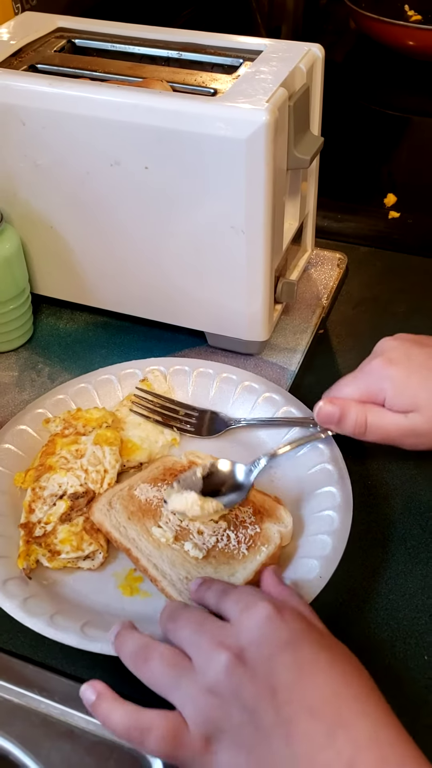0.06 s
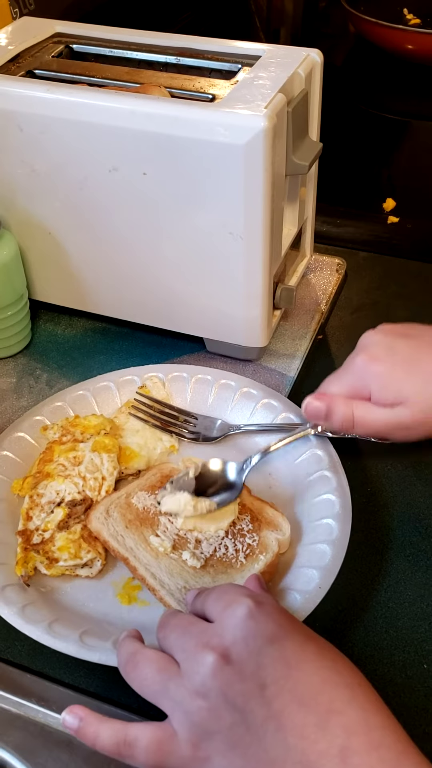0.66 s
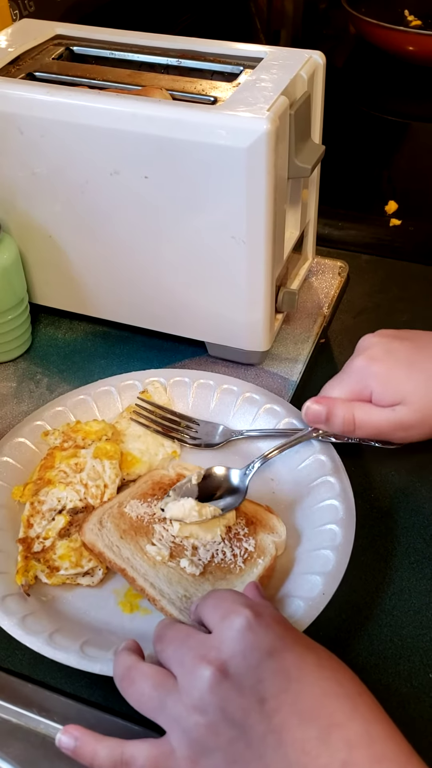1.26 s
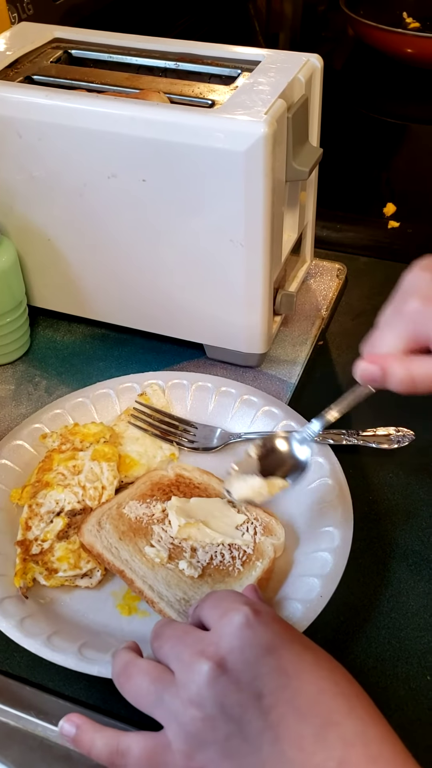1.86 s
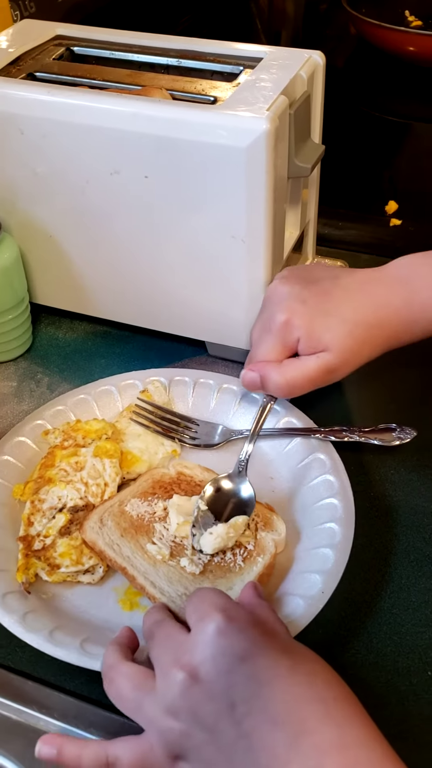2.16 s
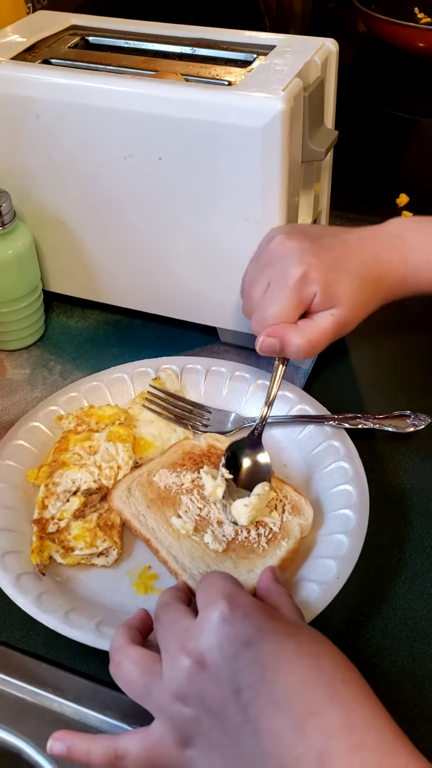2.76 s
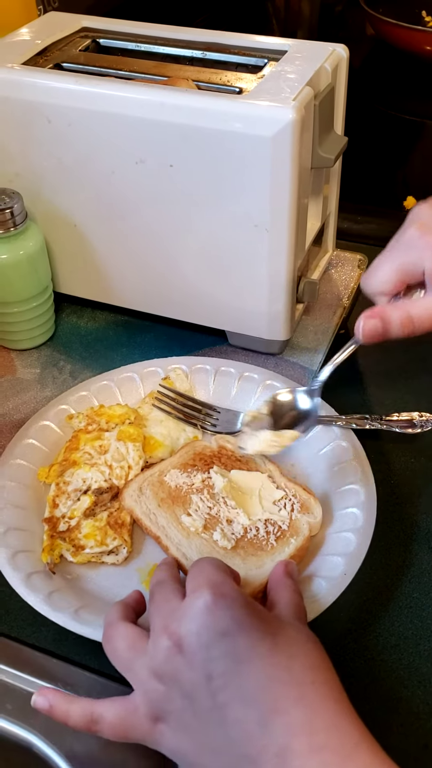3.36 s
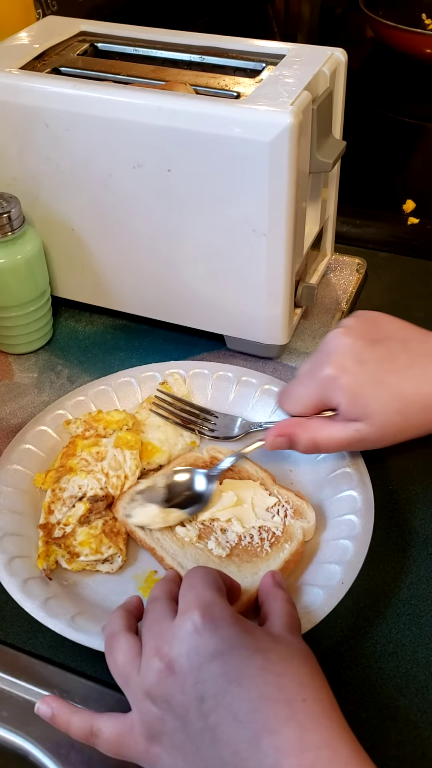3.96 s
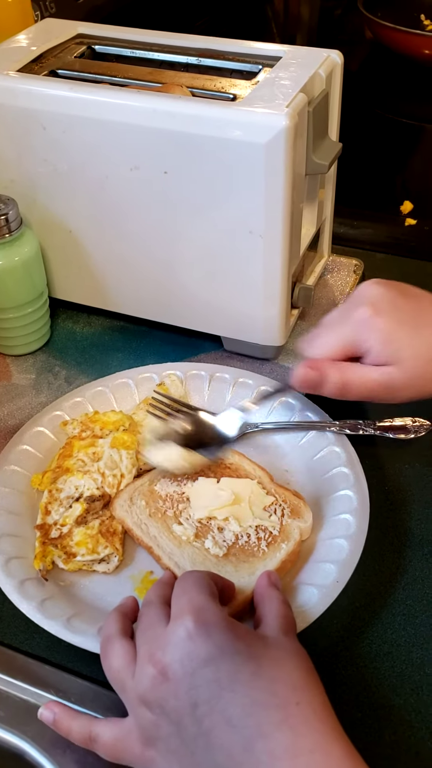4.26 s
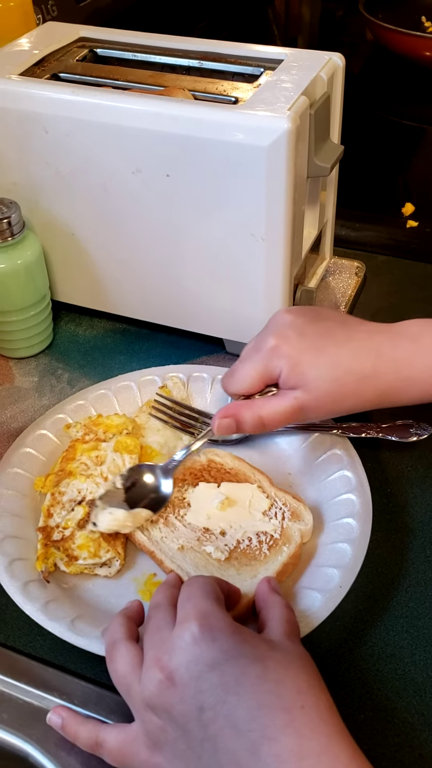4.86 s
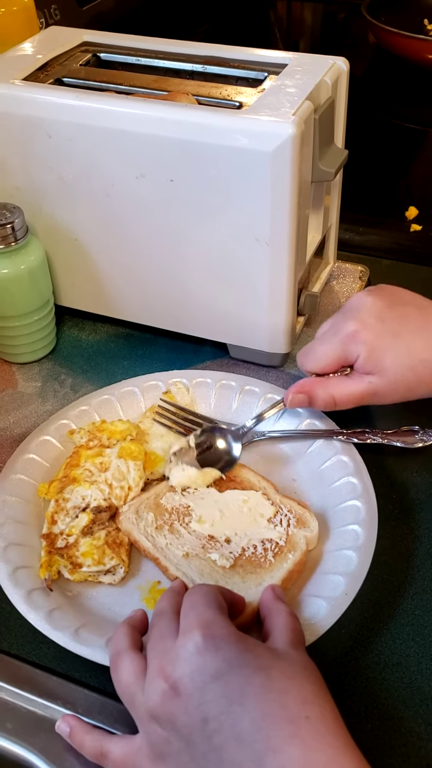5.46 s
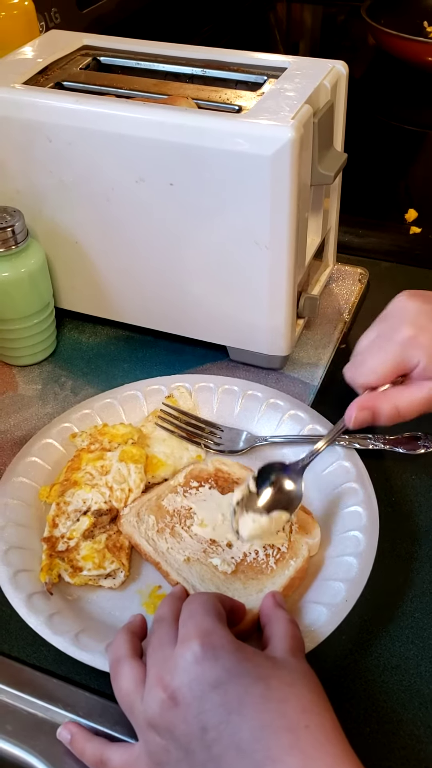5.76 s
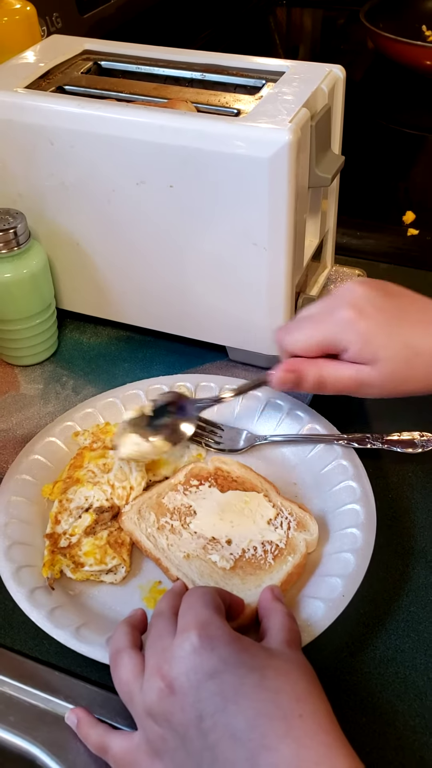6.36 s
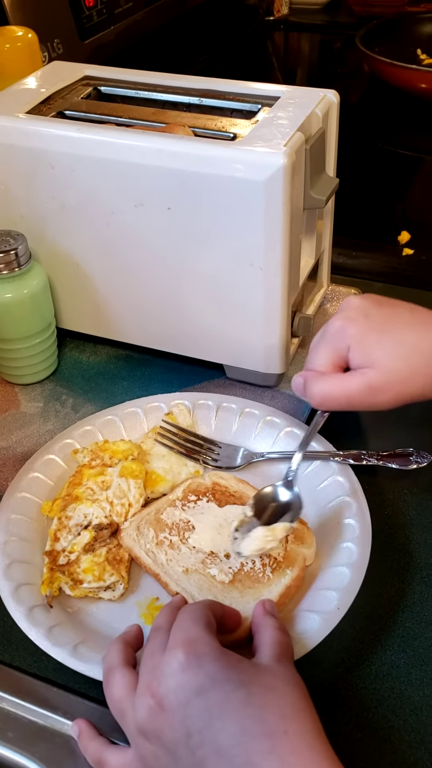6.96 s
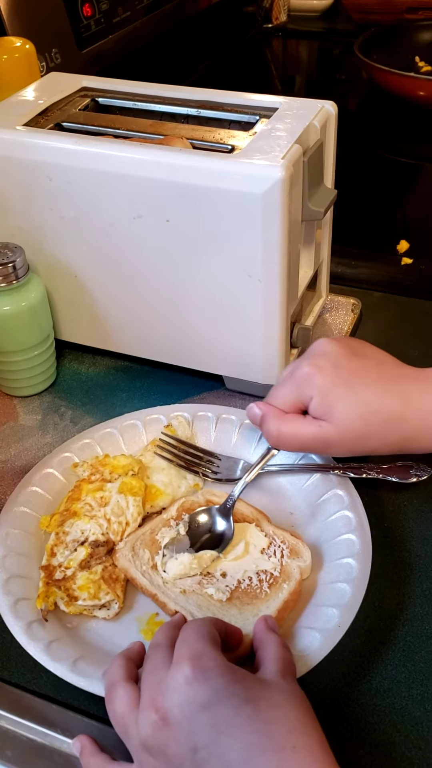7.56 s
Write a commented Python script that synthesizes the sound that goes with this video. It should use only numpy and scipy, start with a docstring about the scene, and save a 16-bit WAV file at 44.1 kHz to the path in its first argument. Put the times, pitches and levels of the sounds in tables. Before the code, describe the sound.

A metal spoon scrapes butter over dry toast in short scratchy strokes, with crisp crust cracks and a faint appliance hum.

```python
"""A metal spoon spreads butter on dry toast, close by in a small kitchen where an appliance hums.
From the start, friction crackles under each stroke and the spoon pats the light plate through the bread.
The brittle crust snaps in sharp single cracks, most often between 1 and 2.7 s.
Near 3 s two dull bumps excite the modes of the counter. The strokes go on, mostly softer,
until a last firm one breaks the crust again at about 7.4 s."""
import sys
import numpy as np
from scipy import signal
from scipy.fft import rfft, irfft, next_fast_len
from scipy.io import wavfile
from scipy.ndimage import map_coordinates

SR = 44100
rng = np.random.default_rng(int(sys.argv[2]) if len(sys.argv) > 2 else 0)


def store_wav(level_fs):
    """Save 16-bit WAV to argv[1]."""
    pcm = np.round(np.clip(np.atleast_2d(level_fs), -1, 1) * 32767)
    wavfile.write(sys.argv[1], SR, pcm.T.astype(np.int16))


N = 335160

# Levels are relative: each source applies its own gain and filters.
# partials of the appliance hum: pitch_hz, level_db
HUM_PARTIALS = [(53.4, -3.5), (106.4, -12), (267, -22)]
# spectrum of the room's air: frequency_hz, level_db
AIR_SPECTRUM = [(15, -44.5), (27, -27), (56, -0.5), (80, -9.5), (97, -19), (313, -19.5), (459, -21),
                (499, -29.5), (567, -25.5), (617, -33), (4000, -49), (5200, -86.5), (8800, -120)]
# left-right likeness of the air noise: frequency_hz, coherence_ratio
AIR_COHERENCE = [(100, 0.99), (300, 0.92), (700, 0.34), (2000, .1)]
# spectrum of the microphone hiss: frequency_hz, level_db
HISS_SPECTRUM = [(3500, -7.5), (5000, -5.5), (6000, -8), (6350, 7), (7000, -5), (7700, -2), (8200, -20.5),
                 (10000, -10.5), (12500, 2), (15800, -5.5)]
# stereo balance of the background: frequency_hz, left_minus_right_db
ROOM_BALANCE = [(60, 0), (110, -4), (200, -3.5), (380, -9.5), (700, -1), (1290, -2), (2380, 3.5),
                (4400, -2), (8120, -21.5), (15000, -6.5)]
# reverberation of the kitchen: frequency_hz, t60_s
KITCHEN_DECAY = [(200, 0.24), (2000, 0.36), (6000, 0.35), (15000, 0.33)]
# blows on the counter and the band each excites: start_s, level_db, low_hz, high_hz
COUNTER_BLOWS = [(2.835, -33.5, 109, 240), (2.859, -34.5, 59.5, 278), (2.913, -43, 45, 150),
                 (3.006, -36.5, 320, 745), (3.023, -31.5, 34.8, 80.5)]
# modes of the counter: pitch_hz, level_db, t60_s
COUNTER_MODES = [(68, 2.5, 0.22), (158, -14, 0.11), (167.3, 2.5, 0.16), (252.5, -17, 0.15),
                 (300, -18, 0.11), (361.5, -9, 0.16), (421, -13, 0.17), (494, -8.5, 0.18),
                 (1490, -18, 0.21)]
# the spoon presses the plate onto the counter: start_s, level_db
PLATE_PATS = [(0.001, -36), (0.041, -47), (0.411, -49), (0.69, -46.5), (0.716, -45.5), (1.11, -35),
              (1.168, -42), (1.438, -46.5), (1.465, -36.5), (2.567, -51), (3.006, -45), (4.034, -46),
              (4.425, -48.5), (5.574, -48.5), (7.16, -52), (7.184, -50)]
# modes of the plate: pitch_hz, level_db, t60_s
PLATE_MODES = [(288, -6.5, 0.064), (372, -2, 0.021), (454, 0.5, 0.055), (650, -11.5, 0.017),
               (930, -9.5, 0.033), (1070, -7, 0.093), (1820, -15, .04)]
# spectrum of the rustle in a pat: frequency_hz, level_db
RUSTLE_SPECTRUM = [(40, -15), (130, -1.5), (450, -5.5), (750, -8.5), (1100, -10.5), (2500, -18),
                   (6000, -19)]
# strokes of the spoon: start_s, length_s, firmest_fraction, level_db, body_offset_db, crumb_offset_db
SPOON_STROKES = [(0.0, 0.093, 0.16, -35.5, 2.5, -7.5), (0.093, 0.24, 0.4, -48.5, -2.5, 1.5),
                 (0.408, 0.089, 0.4, -64, 3.5, 0), (0.694, 0.28, .1, -61.5, -2, 12),
                 (0.848, 0.15, 0.7, -58.5, 7, 19), (1.099, 0.093, 0.16, -50, 8, 4),
                 (1.358, 0.13, 0, -45.5, -13.5, -13), (1.607, 0.12, 1, -59.5, 5, -7),
                 (2.007, 0.38, 0.25, -54.5, -8.5, -7.5), (2.309, .11, 1, -65.5, 14.5, 17),
                 (2.481, .15, 0.3, -47, 9, 3), (2.658, 0.13, 0.28, -56, 2.5, -20),
                 (2.788, 0.17, 0.25, -57, 1.5, -2), (3.053, 0.44, 0.31, -55, -2.5, -7),
                 (3.762, 0.23, 0.3, -57, 3, -1.5), (3.934, 0.11, 0.57, -51.5, 2.5, 29),
                 (4.475, .14, 0.4, -52, 2, -5), (4.69, 0.36, .5, -59, -7, 12),
                 (5.26, 0.14, 0.9, -69, -7, 11), (5.436, 0.22, 0.3, -53.5, -2.5, 2.5),
                 (5.686, 0.27, 0.6, -60.5, -17, -3), (5.987, 0.08, 0.7, -50, -2, 4),
                 (6.076, 0.21, 0.07, -50, -1, 7), (6.371, 0.22, 0.38, -73, -6, -5),
                 (6.597, 0.087, 0, -59.5, -3, -4), (6.76, 0.22, 0.13, -70.5, -11, 1),
                 (7.05, 0.39, 0.3, -69, -4, 15), (7.263, .26, 0.77, -45.5, -6.5, -1.5)]
# spectrum of the spoon on buttered toast: frequency_hz, level_db
SCRAPE_SPECTRUM = [(410, -45), (700, -17.5), (958, -13), (1060, -10), (1150, -10.5), (1250, -13),
                   (1620, -4.5), (1970, -10), (2270, -6), (3280, -16), (6650, 3), (8210, -14.5),
                   (12300, -4), (15200, -4), (16000, -21.5)]
# the loudest breaks of the crust: start_s, level_db, body_level_db
CRUST_BREAKS = [(0.154, -21, -49), (0.3057, -27, -58.5), (0.6883, -36, -49.5), (0.9133, -28, -59.5),
                (0.9857, -29, -55), (1.1104, -20.5, -52.5), (1.1144, -13, -41.5), (1.2466, -35.5, -70),
                (1.4097, -21, -58), (1.4456, -21, -42), (1.5135, -23, -45.5), (1.6352, -23.5, -60),
                (1.6621, -18, -47.5), (1.8018, -26, -50.5), (2.1156, -29, -48.5), (2.1645, -29, -56.5),
                (2.3136, -26, -57.5), (2.3595, -20.5, -41), (2.4698, -19.5, -43), (2.4904, -20, -47.5),
                (2.5007, -17.5, -44), (2.5481, -17.5, -48), (2.5564, -24.5, -41.5), (2.6479, -25.5, -56),
                (2.8613, -36.5, -65), (3.7818, -25.5, -67), (3.9564, -28, -59.5), (3.977, -32.5, -62),
                (4.0367, -40, -41), (4.0497, -23.5, -56), (4.5042, -28, -49), (4.5416, -30, -55),
                (4.8479, -41, -75), (4.8973, -37.5, -59), (4.9119, -36.5, -71), (5.484, -35.5, -76),
                (5.5797, -39, -57.5), (6.0008, -23, -53), (6.1988, -36.5, -71), (7.3816, -17.5, -46),
                (7.4594, -23, -48.5)]
# spectrum of the breaking crust: frequency_hz, level_db
CRUST_SPECTRUM = [(290, -46.5), (500, -16), (807, -29), (1130, -14.5), (1360, -21), (1640, -9.5),
                  (2070, -14), (2570, -8.5), (3340, -16), (4660, -6), (6900, 3.5), (8210, -11.5),
                  (10500, -7), (12100, -0.5), (16000, -6.5)]
# stereo balance of toast and plate: frequency_hz, left_minus_right_db
TOAST_BALANCE = [(200, -7.5), (700, -5.5), (1800, -12.5), (3500, -8), (5000, -17.5), (6700, -23.5),
                 (7600, -16.5), (8400, 9.5), (9500, -2.5), (11000, -3.5), (12300, -14), (15500, -6.5)]


def amp(db):
    """Amplitude ratio: tenfold for every 20 dB."""
    return 10 ** (np.asarray(db) / 20)


def unit_rms(x):
    """Normalisation to unit mean power."""
    return x / np.sqrt(np.mean(x ** 2) + 1e-20)


def along(points, hz):
    """Interpolation of (frequency_hz, value) points on a logarithmic frequency axis."""
    frequencies, values = np.transpose(points)
    return np.interp(np.log(hz + 1), np.log(frequencies + 1), values)


def wobble(rate_hz):
    """Random modulation: a spline through rate_hz Gaussian knots a second."""
    knots = rng.standard_normal(int(N * rate_hz / SR) + 4)
    return map_coordinates(knots, [np.arange(N) * rate_hz / SR])


def filtered(x, gain):
    """Minimum-phase filtering: folding the cepstrum makes the magnitude response gain(hz) causal."""
    size = 2 * next_fast_len(N // 2 + SR // 4)
    magnitude = np.maximum(gain(np.fft.rfftfreq(size, 1 / SR)), 1e-6)
    cepstrum = irfft(np.log(magnitude), size)
    cepstrum[..., 1:size // 2] *= 2
    cepstrum[..., size // 2 + 1:] = 0
    return irfft(rfft(x, size) * np.exp(rfft(cepstrum)), size)[..., :N]


def coloured(x, spectrum):
    """Spectral shaping that conserves the power of white noise."""
    return filtered(x, lambda hz: unit_rms(amp(along(spectrum, hz))))


def panned(x, balance):
    """Constant-power panning: the level difference between the channels depends on frequency."""
    def gains(hz):
        pair = amp(np.outer([.5, -.5], along(balance, hz)))
        return pair / np.sqrt(np.mean(pair ** 2, axis=0))
    return filtered(x, gains)


def bandpass(x, low_hz, high_hz, order):
    """Butterworth filtering: a maximally flat pass band."""
    return signal.sosfilt(signal.butter(order, [low_hz, high_hz], "band", fs=SR, output="sos"), x)


def crossover(surface, body, split_hz):
    """Complementary bands: treble from the surface, middle tones from the bread beneath."""
    treble = filtered(surface, lambda hz: 1 / np.sqrt(1 + (split_hz / (hz + 1)) ** 8))
    return treble + filtered(body, lambda hz: 1 / np.sqrt(1 + (hz / split_hz) ** 8))


def add(track, start_s, sound):
    """Superposition: a sound joins the track at start_s."""
    start = max(round(start_s * SR), 0)
    part = sound[..., :N - start]
    track[..., start:start + part.shape[-1]] += part


def ring(modes, t):
    """Free vibration: a sum of damped modes, varied in strength and pitch at each blow."""
    hz, db, t60 = np.transpose(modes)[:, :, None]
    strength, detune = rng.standard_normal((2, len(modes), 1))
    envelopes = amp(db + 3.7 * strength - 60 * t / t60)
    return np.sum(envelopes * np.sin(2 * np.pi * hz * (1 + 0.023 * detune) * t), axis=0)


def appliance_hum(hum_db=-63, waver_db=3.5, waver_hz=9, drift_s=0.00075):
    """Amplitude and phase modulation make the appliance's low partials waver."""
    t = np.arange(N) / SR + drift_s * wobble(3)
    return np.sqrt(2) * sum(amp(hum_db + db + waver_db * wobble(waver_hz)) * np.sin(2 * np.pi * hz * t)
                            for hz, db in HUM_PARTIALS)


def room_air(air_db=-65):
    """Partial coherence: the air's murmur is alike in both channels only at low frequencies."""
    def mid_side_gains(hz):
        angle = np.arccos(along(AIR_COHERENCE, hz)) / 2
        return np.array([np.cos(angle), np.sin(angle)])
    murmur = coloured(rng.standard_normal((2, N)), AIR_SPECTRUM)
    mid, side = filtered(murmur, mid_side_gains)
    return amp(air_db) * np.array([mid + side, mid - side])


def microphone_hiss(hiss_db=-75):
    """Self-noise: a faint hiss, uncorrelated between the channels."""
    return amp(hiss_db) * coloured(rng.standard_normal((2, N)), HISS_SPECTRUM)


def kitchen_reverb(x, near_db, room_db, near_t60_s):
    """Convolution adds early reflections off toaster and counter, and the room's diffuse tail."""
    out, block = np.zeros((2, N)), SR // 4
    for start in range(0, N, block):  # the echoes change as the spoon moves
        hz, frame_s, noise = signal.stft(rng.standard_normal((2, SR // 2)), SR, nperseg=256)
        decay = amp(-60 * frame_s / along(KITCHEN_DECAY, hz)[:, None])
        tail = signal.istft(noise * decay, SR, nperseg=256)[1]
        t = np.arange(tail.shape[1]) / SR
        near = rng.standard_normal(tail.shape) * amp(-60 * t / near_t60_s)
        response = amp(near_db) * near / np.linalg.norm(near[0])
        response += amp(room_db) * tail / np.linalg.norm(tail[0])
        response[:, 0] += 1  # direct sound
        add(out, start / SR, signal.fftconvolve(x[:, start:start + block], response, axes=1))
    return out


def counter_bumps(gain_db=-3, thud_db=-5, thud_t60_s=.4):
    """Modal excitation: soft blows set the counter booming; harder contact reaches higher modes."""
    out, t = np.zeros(N), np.arange(SR // 2) / SR
    for start_s, db, low_hz, high_hz in COUNTER_BLOWS:
        rumble = unit_rms(bandpass(rng.standard_normal(len(t)), low_hz=49, high_hz=557, order=4))
        thud = amp(thud_db - 60 * t / thud_t60_s) * rumble
        boom = bandpass(ring(COUNTER_MODES, t) + thud, low_hz, high_hz, order=1)
        add(out, start_s, amp(db + gain_db) * boom)
    return out * amp([[-1.5], [1.5]])  # slightly to the right


def plate_pats(gain_db=-9, rustle_db=-1, tick_db=5, rustle_t60_s=0.096, tick_t60_s=.009):
    """Impact: pressing the bread gives a tick, a rustle and the hollow knock of damped plate modes."""
    t = np.arange(SR // 5) / SR
    knocks, rustles, ticks = np.zeros((3, 2, N))
    for start_s, db in PLATE_PATS:
        add(knocks, start_s, amp(db) * ring(PLATE_MODES, t))
        add(rustles, start_s, amp(db - 60 * t / rustle_t60_s) * rng.standard_normal(len(t)))
        add(ticks, start_s, amp(db + tick_db - 60 * t / tick_t60_s) * rng.standard_normal((2, len(t))))
    rustles = amp(rustle_db) * coloured(rustles, RUSTLE_SPECTRUM)
    return amp(gain_db) * (knocks + coloured(ticks, SCRAPE_SPECTRUM) + rustles)


def stroke_envelope(length_s, firmest_fraction, start_db=-10.5, end_db=-14.5, contact_s=.018):
    """Friction noise follows the load: the spoon touches down, presses harder, eases off and lifts."""
    t = np.arange(round(length_s * SR)) / SR
    level_db = np.interp(t / length_s, [0, np.clip(firmest_fraction, .01, .99), 1], [start_db, 0, end_db])
    contact = np.clip(np.minimum(t, length_s - t) / contact_s, 0, 1)
    return amp(level_db) * contact


def spoon_scrape(crumbs_per_s=600, crumb_spread_db=7, flutter_db=3):
    """Stick-slip friction: crumbs break under the spoon's edge, over the hiss of smeared butter."""
    sizes = amp(crumb_spread_db * np.minimum(rng.exponential(size=N), 3.5))
    breaks = rng.random(N) < crumbs_per_s / SR
    crumbs = unit_rms(breaks * sizes * rng.choice([-1, 1], (2, N)))
    smear = rng.standard_normal((2, N))
    stick_slip = amp(flutter_db * wobble(rate_hz=70))
    surface, body = np.zeros((2, 2, N))
    for start_s, length_s, firmest_fraction, db, body_offset_db, crumb_offset_db in SPOON_STROKES:
        envelope = stroke_envelope(length_s, firmest_fraction)
        span = np.clip(round(start_s * SR) + np.arange(len(envelope)), 0, N - 1)
        texture = amp(crumb_offset_db) * crumbs[:, span] + smear[:, span]
        friction = envelope * unit_rms(texture * stick_slip[span])
        add(surface, start_s, amp(db) * friction)
        add(body, start_s, amp(db + body_offset_db) * friction)
    return coloured(crossover(surface, body, split_hz=3580), SCRAPE_SPECTRUM)


def crust_cracks(surface_gain_db=-6, body_gain_db=20, snap_db=9, snap_s=0.00062, spread_db=4):
    """Brittle fracture: a sharp snap, then a run of smaller breaks that lasts longer in a big crack."""
    surface, body = np.zeros((2, 2, N))
    t = np.arange(SR // 30) / SR
    for start_s, db, body_level_db in CRUST_BREAKS:
        crumble_s = 0.0023 * 2 ** ((db + 29.5) / 18.5)  # decay time doubles every 18.5 dB
        envelope = np.exp(-t / crumble_s) + amp(snap_db) * np.exp(-t / snap_s)
        envelope *= 2 / envelope[0]
        fractures = envelope * rng.standard_normal((2, len(t)))
        fractures *= amp(spread_db * rng.standard_normal(len(t)))  # uneven sizes make it spiky
        fractures *= np.linalg.norm(envelope) / np.linalg.norm(fractures, axis=1, keepdims=True)
        add(surface, start_s, amp(db + surface_gain_db) * fractures)
        add(body, start_s, amp(body_level_db + body_gain_db) * fractures)
    return coloured(crossover(surface, body, split_hz=3900), CRUST_SPECTRUM)


def scene():
    """Superposition: toast and plate reverberate, mostly on the right, over bumps and background."""
    toast = crust_cracks() + spoon_scrape() + plate_pats()
    toast = kitchen_reverb(toast, near_db=0, room_db=-5, near_t60_s=0.054)
    bumps = counter_bumps()
    background = appliance_hum() + room_air() + microphone_hiss()
    return panned(background, ROOM_BALANCE) + bumps + panned(toast, TOAST_BALANCE)


def record(dry, cutoff_hz=16100):
    """Band limiting: a steep low-pass removes the highest treble."""
    size = next_fast_len(N + SR // 4)
    gain = 1 / (1 + (np.fft.rfftfreq(size, 1 / SR) / cutoff_hz) ** 120)
    return irfft(rfft(dry, size) * gain, size)[..., :N]


dry = scene()
out = record(dry)
store_wav(out)
```